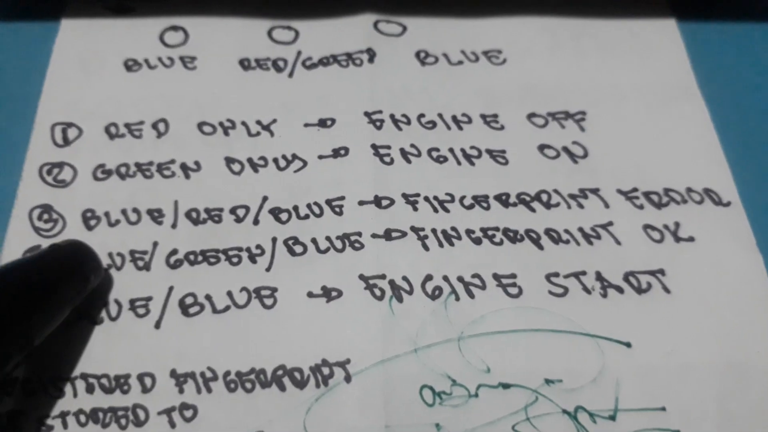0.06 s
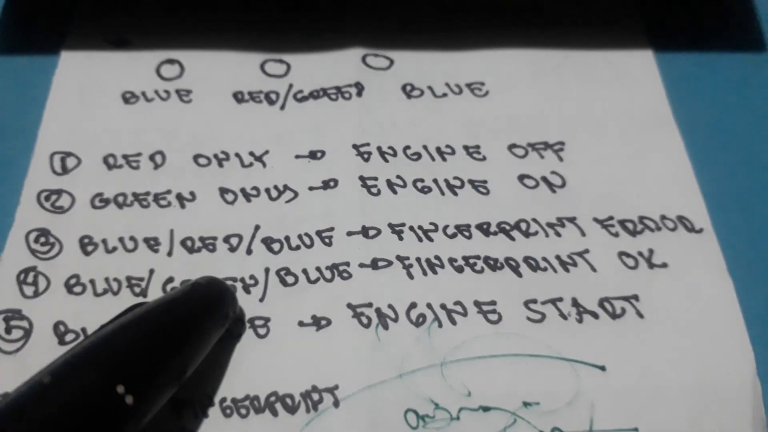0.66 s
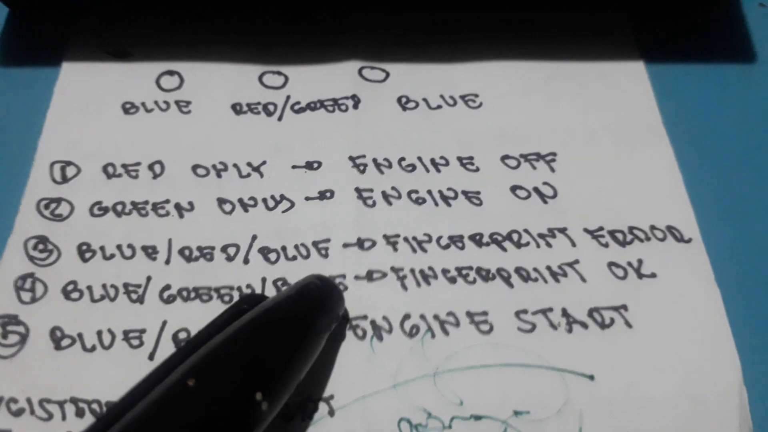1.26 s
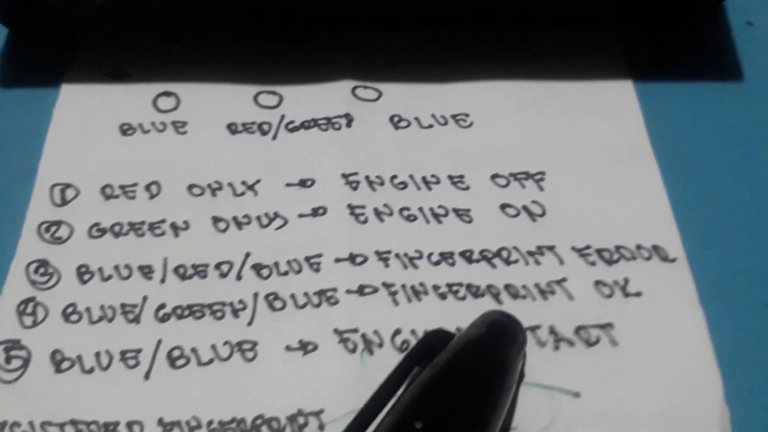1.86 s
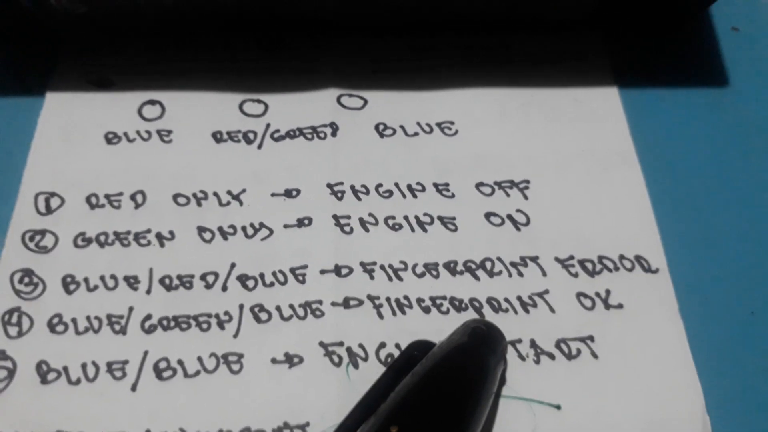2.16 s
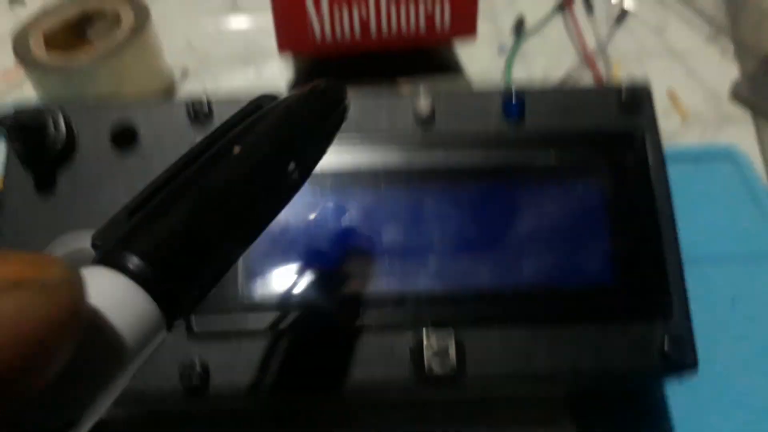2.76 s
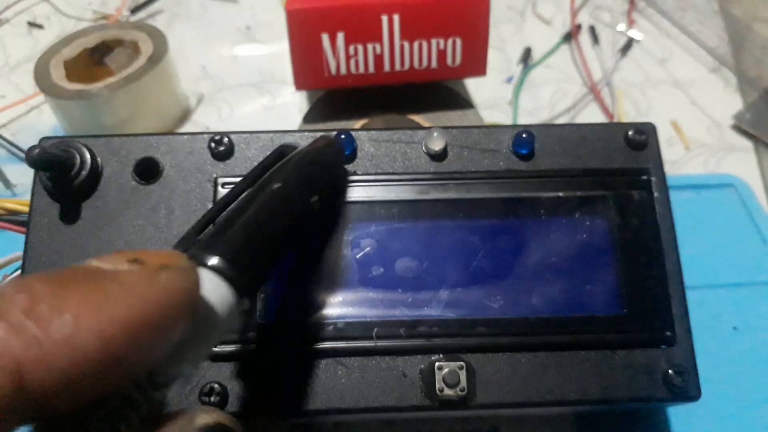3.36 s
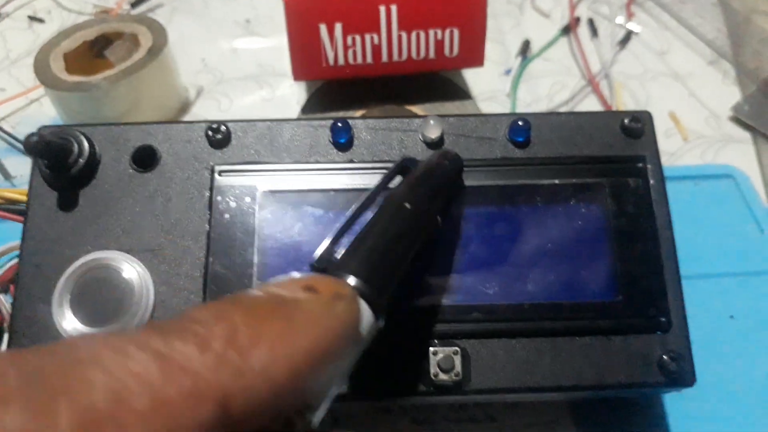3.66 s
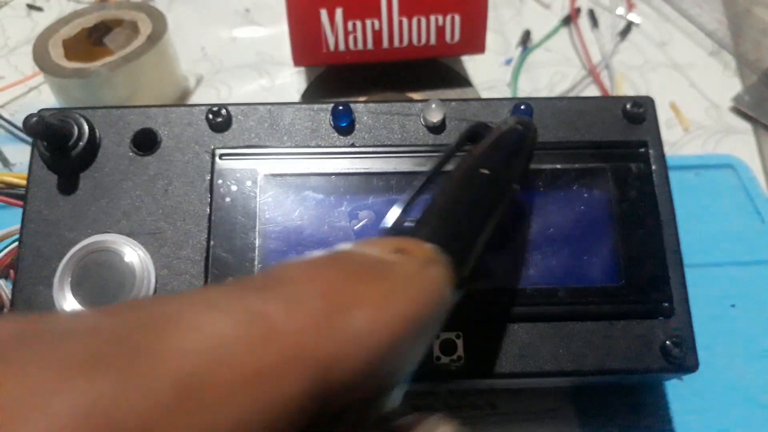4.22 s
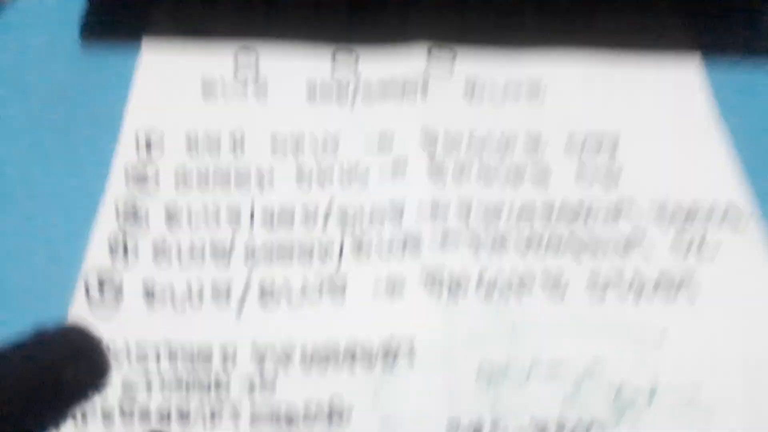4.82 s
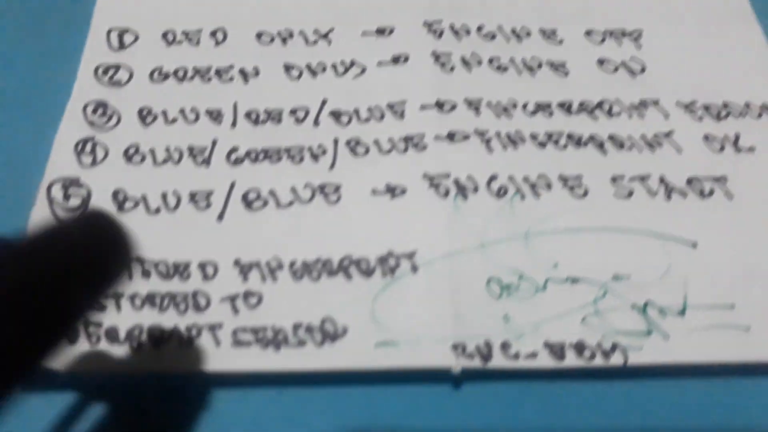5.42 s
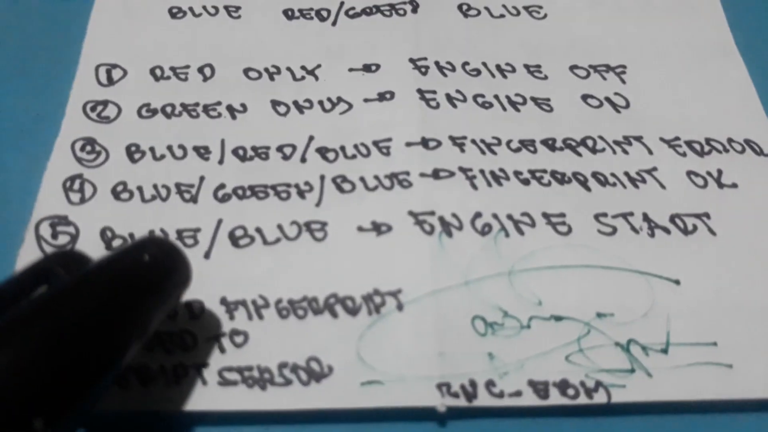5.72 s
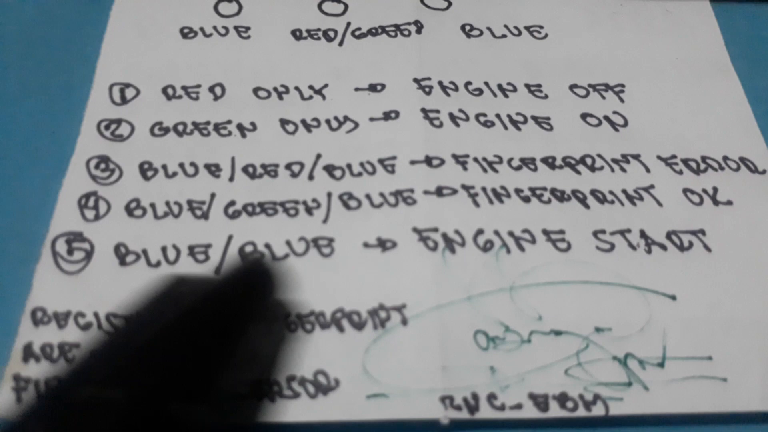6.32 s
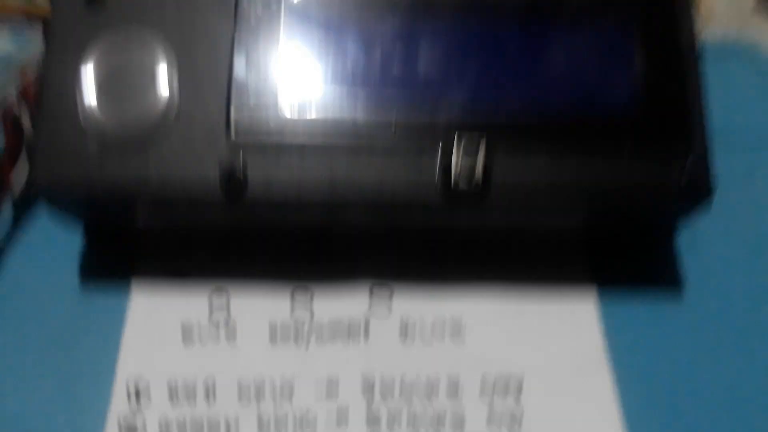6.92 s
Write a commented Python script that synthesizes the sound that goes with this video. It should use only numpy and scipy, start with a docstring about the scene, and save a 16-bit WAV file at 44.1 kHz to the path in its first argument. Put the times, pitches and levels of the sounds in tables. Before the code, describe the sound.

A cricket trills steadily in a small room while a pen lightly ticks on paper and taps a plastic box.

```python
"""A cricket trills in a small room, about 8.6 chirps a second, each made of three falling wing strokes.
Its scraper rubs a file, the wing resonates and the walls reflect the sound. A hand-held microphone
moves from a sheet of paper to a plastic box and back, so the reflections change twice. A pen ticks and
slides on the paper and taps the box, which rings briefly; the hand knocks and rustles softly.
Behind them lie far crickets, a faint hum and hiss."""
import sys
import numpy as np
from scipy import signal
from scipy.fft import rfft, irfft, next_fast_len
from scipy.io import wavfile
from scipy.ndimage import map_coordinates

SR = 44100
rng = np.random.default_rng(int(sys.argv[2]) if len(sys.argv) > 2 else 0)


def transcribe(signal):
    """Save signal, clipped to [-1, 1], as a 16-bit WAV file at the path in sys.argv[1]."""
    frames = np.atleast_2d(signal).T
    limited = np.clip(frames, -1, 1)
    pcm = np.round(limited * 32767).astype(np.int16)
    wavfile.write(sys.argv[1], SR, pcm)


N = 312228
WALL_S = 0.004623  # delay of the near wall's reflection


def cricket(chirps_per_s=8.55, uneven_db=0.3, sway_s=4e-6, drift_db=-9, octave_echo_db=7):
    """Multipath propagation: chirps arrive by strong paths and a diffuse echo; hand sway varies both."""
    # Each row: time in seconds, lateness against the steady beat in seconds.
    lag = [(0.0, -0.0051), (1.05, -0.018), (1.17, -0.014), (2.46, -0.024), (2.69, -0.0194), (2.92, -0.0208),
           (3.98, -0.01), (5.26, -0.0165), (6.08, -0.0078), (6.43, -0.0124), (6.78, -0.024), (7.02, -0.026)]
    # Each row: time in seconds, rms level at the microphone in dB.
    loudness = [(0.0, -41.5), (0.23, -40), (1.05, -39.5), (2.57, -40.5), (4.21, -38.5), (4.8, -42),
                (4.91, -40), (5.03, -42), (7.02, -41.5)]
    # Times in seconds at which the microphone changes place.
    moves = [2.7, 4.55]
    # One list of paths per place; over the paper a near wall answers first.
    # Each row: delay in seconds, relative gain in dB.
    paths = [
        [(0, 6.6), (WALL_S, 5.3), (0.00818, -1.2), (.0112, 5), (0.021, 0), (0.013, -9), (0.032, -14),
         (0.031, -13)],
        [(0, 7), (.0025, 5.5), (.009, 1.5), (.0235, 1), (.04, -10)],
        [(0, 0.67), (WALL_S, -1.2), (.0085, -2), (0.028, -12), (0.015, -8), (0.03, -10), (0.025, -2)],
    ]
    # Relative gain of the diffuse echo at each place, in dB.
    diffuse_db = [5.5, 1.5, 3.5]
    out, lead_s = np.zeros(N), 0.05
    tails = [room_tail() for _ in range(len(moves) + 1)]
    for beat in np.arange(0, N / SR, 1 / chirps_per_s):
        start = beat + np.interp(beat, *np.transpose(lag))
        db = np.interp(beat, *np.transpose(loudness)) + uneven_db * rng.normal()
        place = np.searchsorted(moves, start)
        echo = amp(diffuse_db[place]) * tails[place] + amp(drift_db) * room_tail()
        for delay, path_db in paths[place]:
            echo[round(abs(delay + sway_s * rng.normal()) * SR)] += amp(path_db)
        tone, octave = chirp(lead_s)
        octave_echo = echo / 2 + amp(octave_echo_db) * room_tail()  # short waves scatter more
        heard = signal.fftconvolve(tone, echo) + signal.fftconvolve(octave, octave_echo)
        beat_rms = np.sqrt(np.sum(heard ** 2) * chirps_per_s / SR)
        add(out, start - lead_s, amp(db) * heard / beat_rms)
    return out


def chirp(lead_s, wing_hz=6810, width_hz=480, octave_db=-38, rasp_db=-18, scatter_s=0.00033):
    """Stridulation: the file slows in each stroke, so its tone falls through the wing's resonance."""
    # Each row: start from the chirp time and length in seconds, first and last pitch in Hz, gain in dB.
    strokes = [(-.043, 0.0085, 6750, 5940, -15.5), (-.0295, 0.011, 7080, 5960, -10),
               (-.0108, 0.01374, 7130, 5690, -6)]
    # How the wing radiates the octave. Each row: frequency in Hz, gain in dB.
    radiation = [(10500, 2.5), (12200, -7.5), (13000, 7.5), (13500, -2), (14200, -9)]
    tone, octave = np.zeros((2, SR // 10))
    for offset, length, first_hz, last_hz, db in strokes:
        u = seconds(length) / length
        hz = first_hz + (last_hz - first_hz) * u ** 3
        hz *= 1 + 0.0047 * rng.normal() + 0.01008 * wobble(1513, len(u))
        phase = 2 * np.pi * np.cumsum(hz) / SR
        # The scraper bites hardest late in the stroke.
        press = np.abs(np.sin(np.pi * u ** 2)) ** 1.35 * amp(db + rng.normal(0, 0.31))
        start = lead_s + offset + scatter_s * rng.normal()
        teeth = 1 + amp(rasp_db) * wobble(2064, len(u))  # uneven teeth add a rasp
        add(tone, start, press * teeth * np.sin(phase))
        octave_swell = np.sqrt(np.sin(np.pi * u)) * (1 + 0.752 * wobble(4500, len(u)))
        add(octave, start, octave_swell * np.sin(2 * phase))
    wing = lambda f: 1j * f * width_hz / (wing_hz ** 2 - f ** 2 + 1j * f * width_hz)
    return filtered(tone, wing), amp(octave_db) * coloured(octave, radiation)


def pen_taps(crack_t60=0.021, pivot_hz=2300, detune=0.02, onset_s=4e-5):
    """Modal ringing: the hard tip excites damped modes of the plastic, a little differently each tap."""
    # Each row: start in seconds, rms level of the first 5 ms in dB, tilt in dB per octave,
    # gain of the modes below the pivot in dB, crack relative to ring in dB.
    taps = [(3.273, -35, -2, -11.5, -11.5), (3.335, -45.5, -9.5, -12, -3), (3.712, -26, 2, -1, -6.5),
            (4.090, -25, 4.5, 4, 2)]
    # Modes of pen and box. Each row: frequency in Hz, relative level in dB, t60 in seconds.
    modes = [(516, -19, 0.042), (801.5, -13, 0.031), (1020, -15.5, 0.0183), (1588, 2, 0.017),
             (1733, 0, 0.018), (2076, 0, 0.01), (2590, -1.5, 0.017), (3139.7, -1, 0.0074),
             (3920, -2, 0.0075), (4700, -2.5, 0.0081), (5740, -5.5, 0.0053), (8300, -22, 0.0041),
             (11900, -13, 0.0033)]
    # The crack of the tip. Each row: frequency in Hz, relative level in dB.
    crack_colour = [(300, -12), (1000, -8.5), (1300, -3), (1600, 7), (2300, 9), (5000, -0.5), (8500, -9),
                    (11000, -10), (14000, -9), (16000, -4)]
    out, t = np.zeros(N), seconds(0.04)
    bass_cut = signal.butter(2, 800, "high", fs=SR, output="sos")  # a small body radiates little bass
    for start, db, tilt_db, low_db, crack_db in taps:
        ring = np.zeros(len(t))
        for k, (hz, mode_db, t60) in enumerate(modes):
            shading_db = tilt_db * np.log2(hz / pivot_hz) + low_db * (hz < pivot_hz)
            gain = amp(mode_db + rng.normal() + shading_db)
            tuned_hz = hz * (1 + detune * rng.normal())
            ring += gain * decay(t, t60) * np.sin(2 * np.pi * tuned_hz * t + k * np.pi)
        ring *= 1 - np.exp(-t / onset_s)
        crack = coloured(rng.standard_normal(len(t)) * decay(t, crack_t60), crack_colour)
        blow = signal.sosfilt(bass_cut, unit(ring) + amp(crack_db) * unit(crack))
        add(out, start, amp(db) * blow / np.std(blow[:SR // 200]))
    return out


def pen_ticks(t60=0.011):
    """Impact noise: each light, brief contact of pen and paper gives a broadband burst."""
    # Each row: start in seconds, peak level in dB.
    ticks = [(.097, -43.5), (.283, -51.5), (.322, -46.5), (0.637, -49.5), (0.816, -52), (.944, -50),
             (.970, -48), (1.206, -49), (1.410, -44.5), (1.623, -43.5), (1.633, -49), (1.657, -44.5),
             (1.672, -51.5), (2.054, -45.5), (5.989, -48.5), (6.316, -44.5), (6.473, -37), (6.549, -43.5)]
    # Each row: frequency in Hz, relative level in dB.
    colour = [(300, -36), (1500, -24), (2500, -9), (4800, -6.5), (8500, -21.5), (12000, -13.5),
              (16000, -55)]
    out, t = np.zeros(N), seconds(0.084)
    for start, db in ticks:
        tick = coloured(rng.standard_normal(len(t)) * decay(t, t60), colour)
        add(out, start, amp(db) * tick / np.abs(tick).max())
    return out


def pen_slides(grain_db=3):
    """Sliding friction: the pen makes short swells of grainy noise."""
    # Each row: start in seconds, length in seconds, rms level in dB.
    slides = [(1.603, 0.0553, -66), (2.409, 0.0539, -55), (3.772, 0.04, -64)]
    # Each row: frequency in Hz, relative level in dB.
    colour = [(300, 1.5), (1500, -3.5), (2500, 9.5), (4000, -6.5), (9000, -4.5), (16000, -4)]
    out = np.zeros(N)
    for start, length, db in slides:
        u = seconds(length) / length
        grains = rng.standard_normal(len(u)) * amp(grain_db * wobble(340, len(u)))
        add(out, start, amp(db) * unit(coloured(grains, colour) * np.sin(np.pi * u)))
    return out


def hand_knocks():
    """Soft impact: the hand excites little treble, so its knocks are dull."""
    # Each row: start in seconds, initial rms level in dB, t60 in seconds,
    # strongest frequency in Hz, treble corner in Hz.
    knocks = [(1.478, -55, 0.036, 200.7, 1000), (2.449, -39.5, 0.028, 200, 2530),
              (2.454, -51, 0.147, 84.05, 265), (4.617, -50, 0.12, 152, 201)]
    out, t = np.zeros(N), seconds(0.084)
    for start, db, t60, low_hz, dull_hz in knocks:
        colour = [(low_hz / 2, -14), (low_hz, 0), (dull_hz, -5), (2 * dull_hz, -25), (10 * dull_hz, -60)]
        thud = unit(coloured(rng.standard_normal(len(t)), colour))
        add(out, start, amp(db) * thud * decay(t, t60))
    return out


def hand_rustle():
    """Friction noise: each shift of the hand is one smooth, low swell."""
    # Each row: start in seconds, length in seconds, rms level in dB.
    shifts = [(2.579, 0.474, -72.5), (4.302, 0.63, -74), (5.682, 0.49, -71)]
    # Each row: frequency in Hz, relative level in dB.
    colour = [(120, -19), (260, -6.5), (360, 0), (480, -6.5), (700, -13), (2000, -27), (6000, -71.5)]
    out = np.zeros(N)
    for start, length, db in shifts:
        u = seconds(length) / length
        swell = coloured(rng.standard_normal(len(u)), colour) * np.sin(np.pi * u)
        add(out, start, amp(db) * unit(swell))
    return out


def far_crickets(level_db=-54, shimmer_db=2.5):
    """Incoherent summation: many crickets, out of step, blur into a shimmering band and its octave."""
    # Each row: frequency in Hz, relative spectral density in dB.
    bands = [(5000, -35), (5700, -25), (5900, -19.5), (6300, -9), (6800, -4), (7150, -4), (7450, -8.5),
             (7700, -24), (8100, -28.5), (9500, -45.5), (13600, -34), (14300, -31), (14900, -61)]
    return unit(coloured(rng.standard_normal(N), bands)) * amp(level_db + shimmer_db * wobble(43, N))


def room_tail(build_s=0.0016):
    """Reverberation: a diffuse echo of energy 1 in which each frequency dies at its own rate."""
    # Each row: frequency in Hz, t60 in seconds.
    reverb_times = [(200, 0.29), (2000, .2), (6800, 0.2354), (14000, 0.086)]
    hz, t, spectrum = signal.stft(rng.standard_normal(SR // 3), SR, nperseg=256)
    fade = decay(t, along(reverb_times, hz)[:, None])
    rise = 1 - np.exp(-t / build_s)
    tail = signal.istft(spectrum * fade * rise, SR, nperseg=256)[1]
    return tail / np.linalg.norm(tail)


def air(level_db=-64, patchy_db=0.54):
    """Partial coherence: a faint hiss is nearly alike in both channels."""
    # Each row: frequency in Hz, relative spectral density in dB.
    colour = [(25, -16), (42, -17), (57, -2.5), (80, -3), (150, -0.5), (320, -4.5), (750, -7), (1250, -12),
              (2500, -14), (4500, -19.5), (9500, -27.5), (11500, -19.5), (13500, -17), (15200, -19.5)]
    # Each row: frequency in Hz, side signal relative to mid in dB.
    width = [(30, -25.5), (100, -19.5), (350, -16.5), (4000, -6.5), (9000, -21.5), (14000, -7)]
    noise = unit(coloured(rng.standard_normal((2, N)), colour))
    mid, side = noise * amp(level_db + patchy_db * wobble(3.68, N))
    side = coloured(side, width)
    return mid + np.array([side, -side])


def hum(waver_db=1.94, waver_rad=0.41):
    """Random modulation: four faint tones waver in level and phase."""
    # Each row: frequency in Hz, rms level in dB.
    tones = [(154, -78), (240, -79), (680, -86), (874, -82)]
    out, t = np.zeros(N), np.arange(N) / SR
    for hz, db in tones:
        peak = np.sqrt(2) * amp(db + waver_db * wobble(1.976, N))
        out += peak * np.sin(2 * np.pi * hz * t + waver_rad * wobble(12, N))
    return out


def amp(db):
    """Decibels to gain."""
    return 10 ** (np.asarray(db) / 20)


def decay(t, t60):
    """Exponential damping: a fall of 60 dB in t60 seconds."""
    return amp(-60 * t / t60)


def unit(x):
    """Scale to rms 1."""
    return x / np.sqrt(np.mean(x ** 2) + 1e-20)


def along(points, hz):
    """Interpolate (Hz, value) points on a logarithmic frequency axis."""
    knots_hz, values = np.transpose(points)
    return np.interp(np.log(hz + 1), np.log(knots_hz + 1), values)


def seconds(length):
    """A time axis in seconds."""
    return np.arange(int(length * SR)) / SR


def wobble(rate, size):
    """A smooth random curve with rate knots a second."""
    knots = rng.standard_normal(int(size * rate / SR) + 4)
    return map_coordinates(knots, [np.arange(size) * rate / SR])


def filtered(x, response):
    """Linear filtering: multiply the spectrum of x by a frequency response."""
    n = x.shape[-1]
    padded = next_fast_len(n + 2048)
    return irfft(rfft(x, padded) * response(np.fft.rfftfreq(padded, 1 / SR)), padded)[..., :n]


def coloured(x, points):
    """Filter x by a curve of (Hz, dB) points."""
    return filtered(x, lambda hz: amp(along(points, hz)))


def add(track, start, sound):
    """Mix a sound into a track at start seconds."""
    i = round(start * SR)
    part = sound[max(-i, 0):max(len(track) - i, 0)]
    track[max(i, 0):max(i, 0) + len(part)] += part


def scene(room_db=-19, spread_db=-28):
    """Superposition: pen and hand are close and almost dry; the crickets are farther off."""
    close = pen_taps() + pen_ticks() + pen_slides() + hand_knocks()
    echo = amp(room_db) * signal.fftconvolve(close, room_tail())[:N]
    side = amp(spread_db) * signal.fftconvolve(close, room_tail())[:N]
    mid = cricket() + far_crickets() + hand_rustle() + close + echo
    return mid + np.array([side, -side]) + air() + hum()


def record(dry, top_hz=15780):
    """Band limiting: nothing above top_hz passes."""
    return filtered(dry, lambda hz: hz < top_hz)


dry = scene()
out = record(dry)
transcribe(out)
```